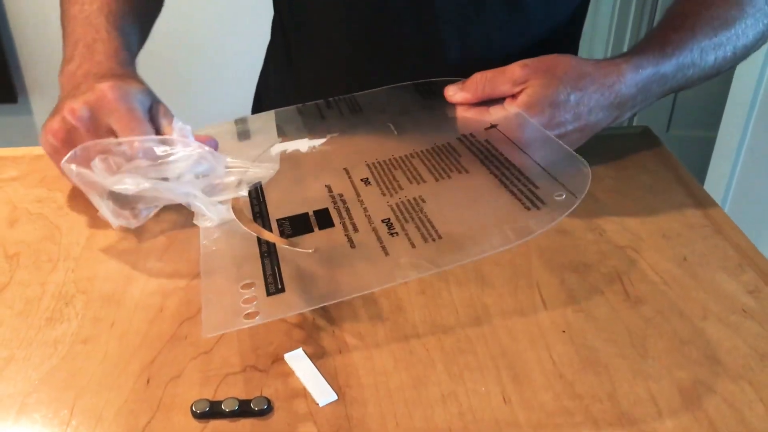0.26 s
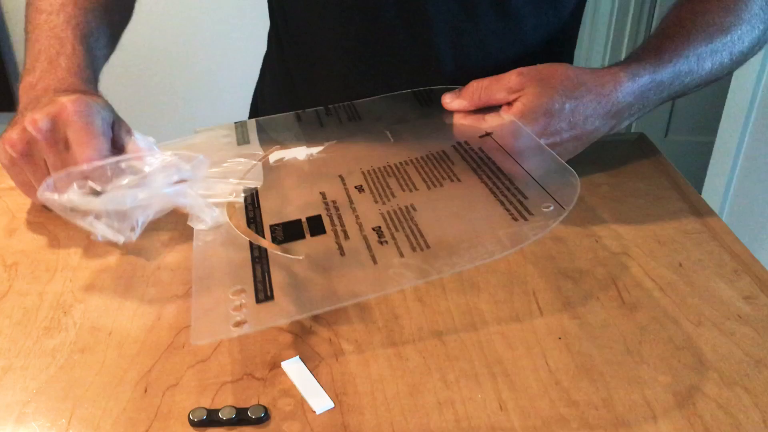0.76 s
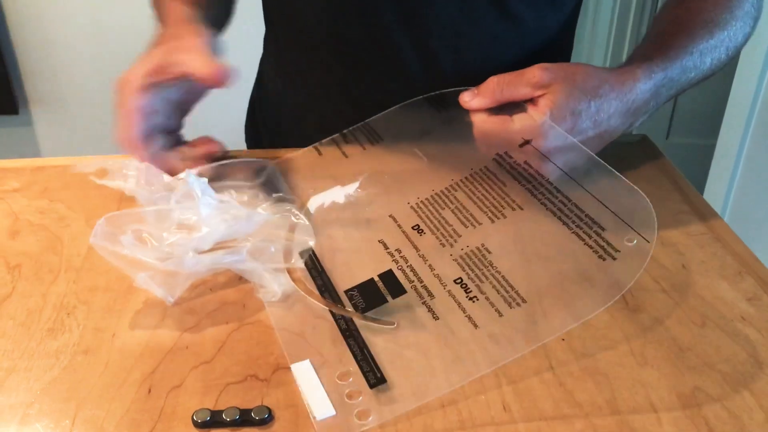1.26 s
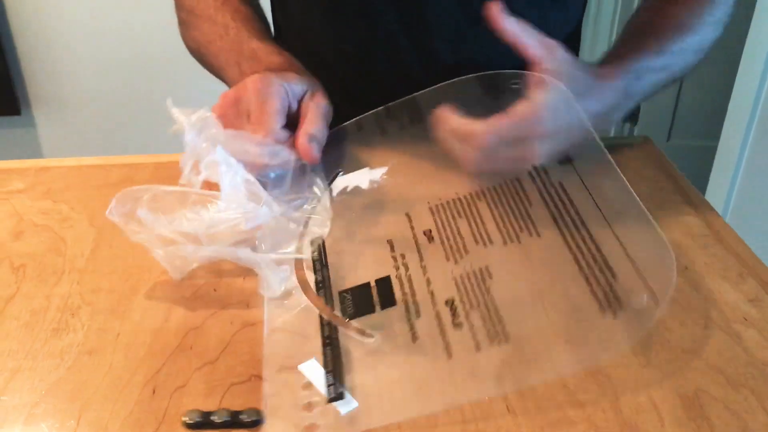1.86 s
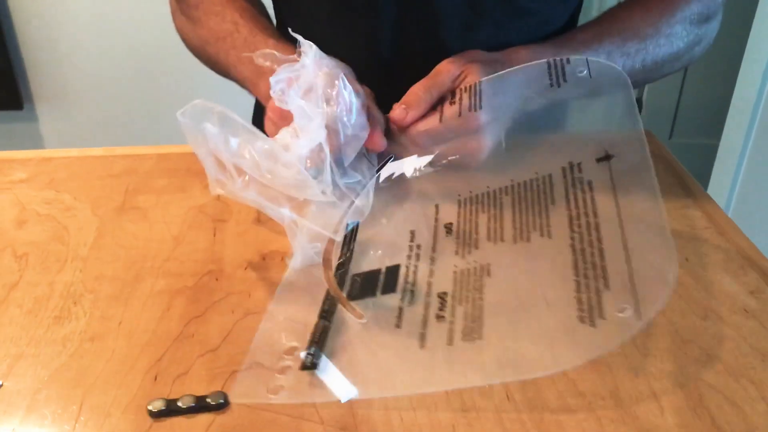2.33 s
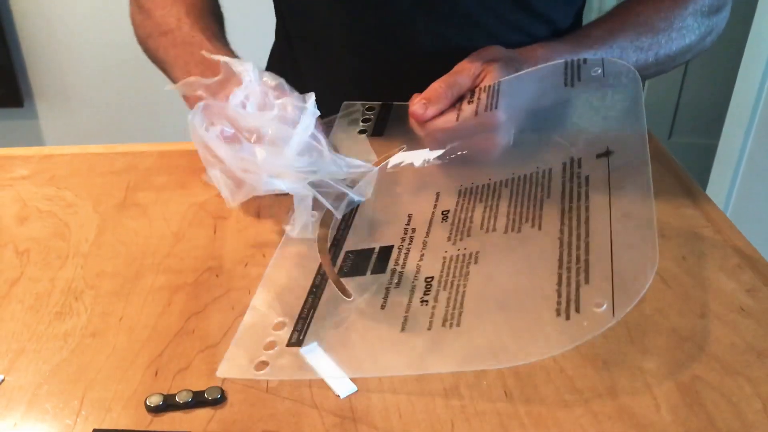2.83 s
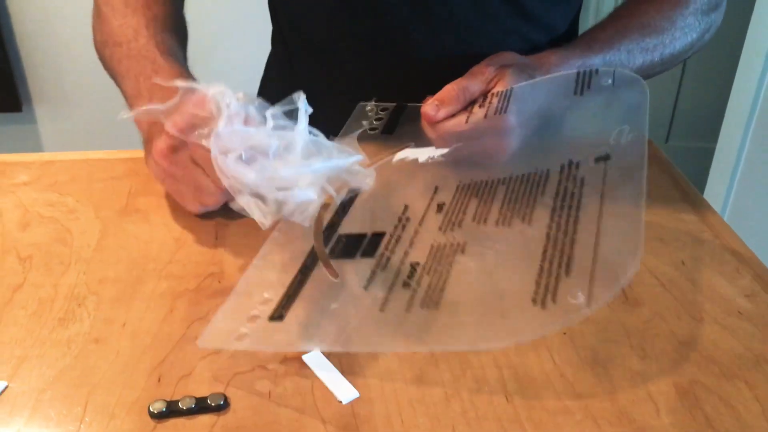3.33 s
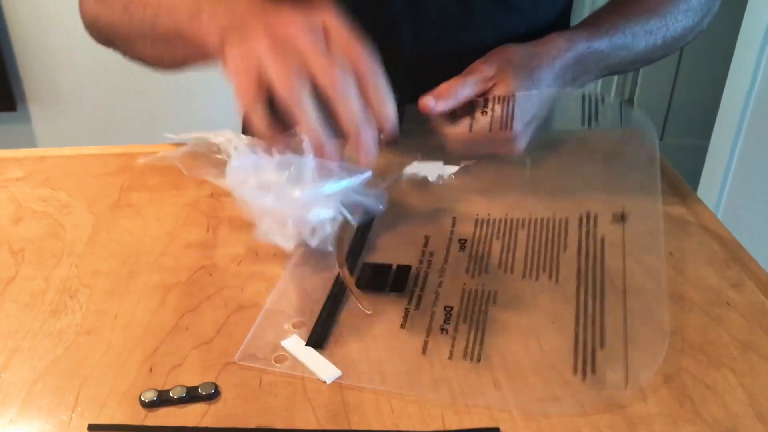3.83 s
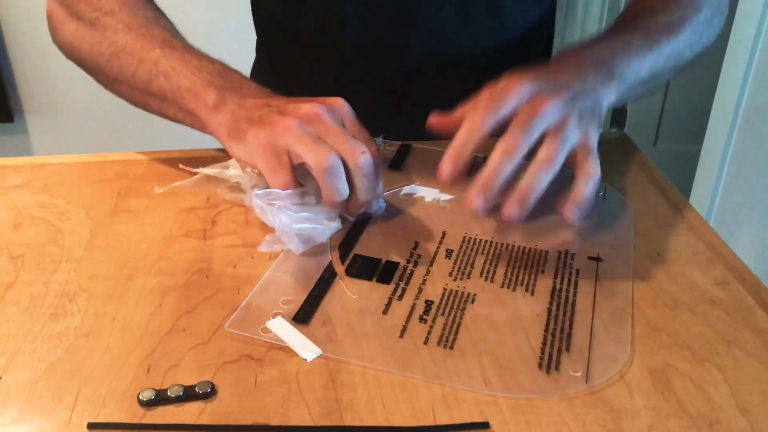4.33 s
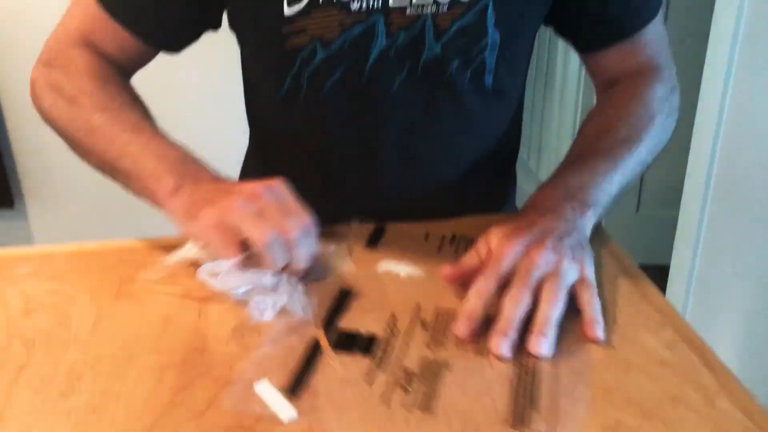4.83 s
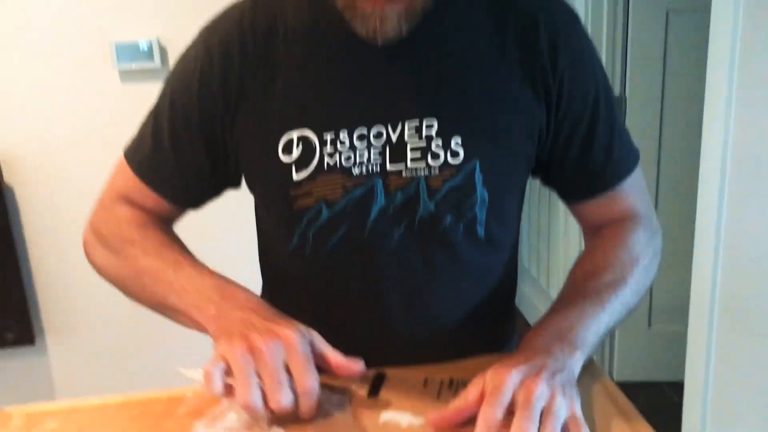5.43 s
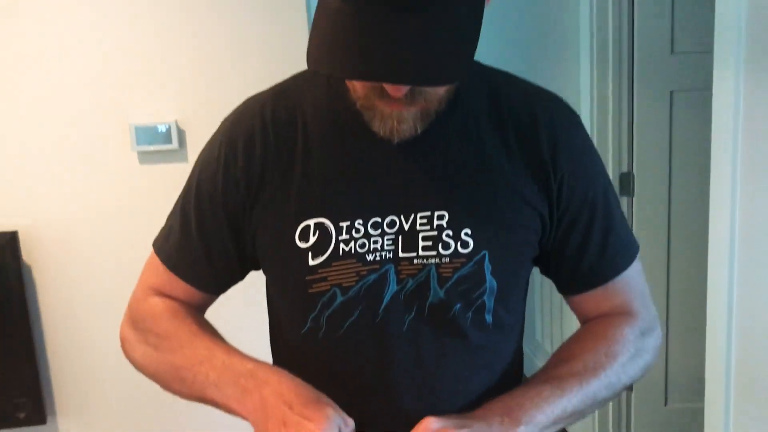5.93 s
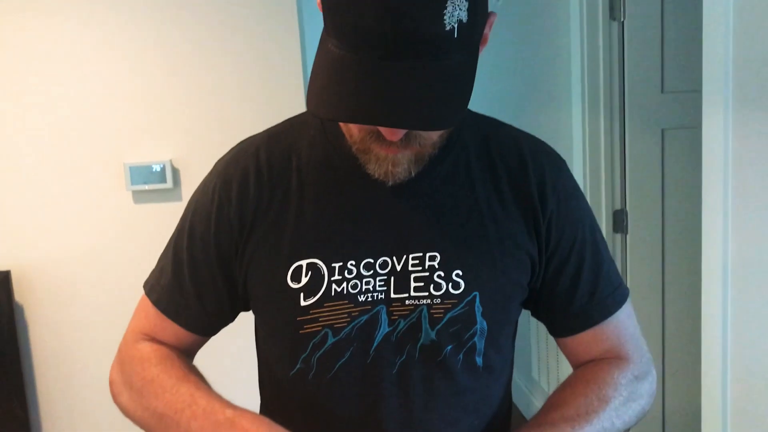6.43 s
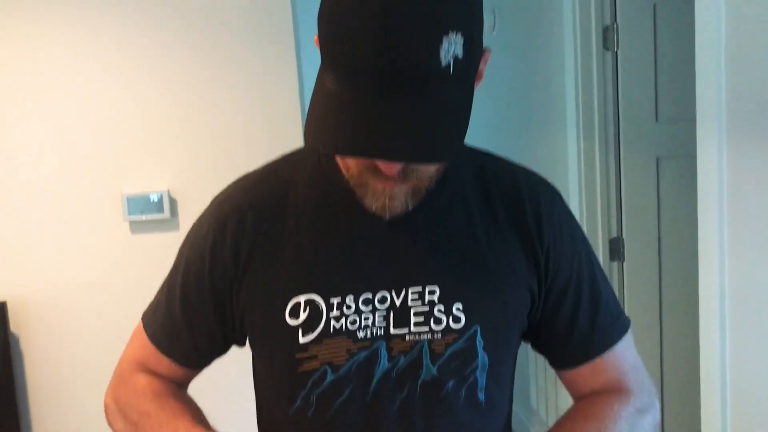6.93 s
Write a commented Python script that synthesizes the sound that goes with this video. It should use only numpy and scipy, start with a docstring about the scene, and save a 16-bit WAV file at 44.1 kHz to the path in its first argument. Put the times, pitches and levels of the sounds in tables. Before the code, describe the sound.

Hands peel crackling film from a plastic sheet that buckles with hollow pops, then scrunch the film up, close by in a small room.

```python
"""First, thin protective film is peeled off a clear plastic sheet. Each pull swells a crinkle of countless
tiny creases, the larger ones snap one by one, and the stiff sheet buckles with hollow pops and bends with
soft falling thumps. From about 3.6 s the loose film is crumpled by hand on a wooden table and crackles
more coarsely. Near 5 s a palm slides the sheet along the table, then the crumpling goes on more gently.
All the while the hands rub dully and a small room answers, close to one microphone."""
import sys
import numpy as np
from scipy import signal
from scipy.fft import rfft, irfft
from scipy.io import wavfile
from scipy.ndimage import uniform_filter1d

SR = 44100
rng = np.random.default_rng(int(sys.argv[2]) if len(sys.argv) > 2 else 0)


def put_to_file(sound):
    """Save the sound as 16-bit audio at rate SR, in the file named by the first command-line argument."""
    columns = np.atleast_2d(sound).T  # one column per channel
    safe = np.clip(columns, -1, 1)
    whole_steps = np.round(safe * 32767)
    wavfile.write(sys.argv[1], SR, whole_steps.astype(np.int16))


N = 316638

# The film sounds in three ranges: a low "body", a middle "crisp" and a high "sizzle".
# Tone of the body and the crisp, for stretched and for loose film: (frequency [Hz], level [dB])
TAUT_BODY = [(150, -27), (400, -12), (540, -1), (720, 3), (1000, 0.5), (1450, 2), (1900, -3.5),
             (2600, -15.5), (6000, -60)]
LOOSE_BODY = [(150, -20), (300, -7.5), (430, -16), (570, -5.5), (740, -9), (1000, 0), (1400, 1.5),
              (1900, -1.5), (2600, -14.5), (6000, -71)]
TAUT_CRISP = [(700, -29), (1600, 1), (2100, -2), (2500, 3), (2950, 4), (4000, 5), (4900, 1.5), (5800, 1.5),
              (7200, -4.5), (12000, -32.5)]
LOOSE_CRISP = [(700, -56), (1600, -8.5), (2000, -5.5), (2450, -6.5), (2900, 4), (3400, 2), (3900, 1.5),
               (4900, -5), (5800, -3), (7200, -12.5), (12000, -72)]
# How fast the wrinkles under the fingers come and go: (changes [1/s], strength [dB])
CLUMPING = [(3, -25), (15, 0), (40, 0), (90, -40), (300, -120)]

def crinkle(peel_per_s=1700, wad_per_s=430, spread_db=6.5, clump_db=2, facets=90):
    """Countless tiny creases flip, each on one facet: a small flat patch of film with its own pitch."""
    db, body_db, sizzle_db = effort()
    loose = looseness(np.arange(N) / SR)
    # peeling lets go in many fine slips, the loose wad in fewer; working harder makes more of both
    rate = (peel_per_s + (wad_per_s - peel_per_s) * loose) * amp(.55 * (db + 51.5))
    kicks = (rng.random(N) < rate / SR) * amp(spread_db * np.minimum(rng.exponential(1, N), 3.2))
    # the hand feeds in energy steadily: a big slip leaves less for its neighbours
    kicks /= np.sqrt(abs(uniform_filter1d(kicks ** 2, size=1100)) + 1.27 * rate / SR)
    facet = rng.integers(0, facets, N)
    facet_hz = 520 * 27 ** rng.random(facets)
    quick = np.clip(.5 + sizzle_db / 16, 0, 1)
    body, crisp, sizzle = amp(body_db - 1), amp(-.5), amp(sizzle_db - 2)
    # (tone, strength, fade time [ms])
    ranges = [(tone(TAUT_BODY), body * (1 - loose), 1.9), (tone(LOOSE_BODY), body * loose, 1.2),
              (tone(TAUT_CRISP), crisp * (1 - loose), .8), (tone(LOOSE_CRISP), crisp * loose, .6),
              (sizzle_tone(5), sizzle * np.sqrt(1 - quick), .4),
              (sizzle_tone(25), sizzle * np.sqrt(quick), .35)]
    out, at = np.zeros(N), np.flatnonzero(kicks)
    for taps, strength, fade_ms in ranges:
        clicks = [np.convolve(crease(fade_ms, size=512), taps)[:len(taps)] for _ in facet_hz]
        rings = np.array([facet_ring(click, hz) for click, hz in zip(clicks, facet_hz)])
        rings /= np.linalg.norm(rings, axis=1, keepdims=True)
        clumps = unit_level(amp(clump_db * noise(CLUMPING)))
        sizes = (kicks * amp(db) * strength * clumps)[at]
        places = at[:, None] + np.arange(len(taps))
        out += np.bincount(places.ravel(), (sizes[:, None] * rings[facet[at]]).ravel(), N)[:N]
    return out

# The film stirring in the grip between strokes: (time [s], level [dB])
GRIP = [(0, -53), (.2, -59), (.42, -64), (.56, -72), (.8, -55), (1.1, -58), (1.28, -69), (1.7, -58.5),
        (2.2, -68), (2.6, -66), (3.2, -75), (3.6, -64.5), (3.8, -77.5), (4.1, -52), (4.45, -59.5),
        (5.1, -45.5), (5.5, -58.5), (7.15, -57.5)]
# Pulls and squeezes: (start [s], length [s], level [dB], extra body [dB], extra sizzle [dB])
STROKES = [(-.02, 0.12, -40.5, -1.5, 0), (.2, 0.21, -59, -10, -3), (.65, 0.094, -63.5, 10.5, 9.5),
           (.735, 0.086, -48.5, 1.5, 2), (0.799, 0.055, -41, -1.5, 4.5), (0.859, 0.077, -38, 0, 1.5),
           (0.994, 0.042, -47.5, 3.5, 3.5), (1.3, 0.088, -56, -10, 1), (1.365, 0.02, -57.5, 9.5, 4),
           (1.485, 0.095, -56.5, 3.5, 2), (1.6, 0.11, -51.5, -2, -20), (1.73, 0.16, -51, 3, -6),
           (1.93, 0.098, -50, 2.5, -11), (2.09, 0.073, -60, 2, -5), (2.37, 0.047, -56, 2, 6.5),
           (2.46, 0.077, -48, -11, 5.5), (2.63, 0.1, -44.5, -1, -3.5), (2.875, 0.048, -54, 7, -11),
           (3.045, 0.039, -53, 7.5, -11), (3.37, 0.08, -51.5, -1.5, 6.5), (3.425, 0.087, -45.5, -2, 4),
           (3.857, 0.095, -44, -2, 0), (3.96, 0.16, -44, -4, 0), (4.344, 0.078, -63.5, 13.5, 9),
           (4.425, .05, -51.5, -12, -7), (4.565, 0.21, -52.5, 1, 4.5), (4.679, 0.17, -41, -2, 1),
           (4.816, .125, -33, -3, 0), (4.9, 0.14, -44.5, 0, 6), (5.015, 0.079, -37.5, -1, 0),
           (5.119, 0.089, -42, -6.5, 2), (5.185, 0.043, -37.5, -4.5, 5), (5.211, 0.2, -49, -12, 0),
           (5.495, 0.14, -49, -3.5, -1.5), (5.625, 0.11, -52, -1.5, 3.5), (5.69, 0.088, -50, 1, 5),
           (5.875, 0.17, -54, 1, -1), (5.958, 0.11, -55.5, 4.5, 2), (6.161, 0.058, -47, 1, 5.5),
           (6.33, 0.13, -49, 0, -8), (6.475, 0.068, -46.5, -5.5, 0), (6.74, 0.035, -56.5, 5, 5),
           (6.92, 0.1, -54.5, 4.5, 2.5), (7.066, 0.13, -43, -3, 2)]

def effort():
    """Grip and strokes add up to the crinkle's level, extra body and extra sizzle, in dB over time."""
    power = (amp(curve(GRIP)) * amp([[0], [1.5], [.5]])) ** 2  # rows: crisp, body, sizzle
    for start, length, db, body_db, sizzle_db in STROKES:
        force = hand_force(start, length)
        power += (force * amp([[db], [db + body_db], [db + sizzle_db]])) ** 2
    level, body, sizzle = 10 * np.log10(power)
    return level, body - level, sizzle - level

def hand_force(start, length):
    """One movement of the hand builds, peaks halfway and lets go."""
    progress = np.interp(np.arange(N) / SR, [start, start + length], [0, 1])
    return (4 * progress * (1 - progress)) ** .56

def looseness(time):
    """0 while the film is stretched on the sheet, 1 once it is a loose wad."""
    return np.clip((time - 3.6) / .16, 0, 1)

def crease(fade_ms, size=900):
    """One crease flips: a jumble of vibrations swells, dies fast and lingers in the film around it."""
    age = np.arange(size) * 1000 / SR / fade_ms
    swell = 1 - np.exp(-(age / .11) ** 2)
    return rng.standard_normal(size) * swell * (np.exp(-age) + np.exp(-age / 3))

def facet_ring(sound, hz, boost_db=9):
    """The patch of film around a crease favours one frequency."""
    b, a = signal.iirpeak(hz, Q=5, fs=SR)
    return sound + (amp(boost_db) - 1) * signal.lfilter(b, a, sound)

# Tone of the film's high sizzle: (frequency [Hz], level [dB])
SIZZLE = [(2000, -41.5), (5000, -15), (6400, 1), (7600, -3.5), (8900, 0), (10500, -4), (13000, -1),
          (15800, -3.5), (18000, -40)]

def sizzle_tone(bright_db):
    """A quicker snap is brighter and also reaches higher."""
    db_per_octave = .079 * bright_db
    return tone([(hz, db + db_per_octave * np.log2(max(hz, 6000) / 10000)) for hz, db in SIZZLE])

# The larger creases: (time [s], level [dB], extra body [dB], extra sizzle [dB], facet pitch [Hz])
SNAPS = [(0.0057, -38.5, -18.3, -3, 6550), (0.06, -36.5, -8, -1, 6900), (0.1813, -44, -1.0, 5, 9500),
         (0.2126, -45.5, -2.3, 2, 4560), (0.231, -37.5, -5.5, 2.5, 14450), (0.2973, -35, -12, 2, 9550),
         (0.325, -41.6, -6, 3.5, 3700), (0.4184, -48.5, 2.4, 0, 1510), (0.5065, -49.5, -40, 0.5, 3250),
         (0.5514, -38.7, -7.5, -1.7, 2900), (0.5628, -48.5, -3, -2, 4700), (0.617, -40, -2.5, 3, 1420),
         (0.6617, -41, -5.5, 3, 9110), (0.7227, -44, -4, 1.4, 6460), (0.7527, -34, -2, 2, 11600),
         (0.8381, -31, -6, -4, 4440), (0.844, -37, 2, -5.3, 4010), (0.9508, -38, -23.5, 1.5, 3900),
         (0.9703, -56, -5.3, 14, 10750), (1.0164, -35.5, -4, -5, 8330), (1.0732, -47, -14.0, 1, 14320),
         (1.1078, -47.5, -17.5, 3.5, 6010), (1.1474, -44, -6, -0.1, 5550), (1.474, -46.5, -22, 1, 6440),
         (1.542, -45, -21, 4.5, 12490), (1.61, -46, -10.4, 3, 8630), (1.632, -39, -24, -4, 3620),
         (1.6829, -42, -5.8, -5, 3550), (1.7332, -29.5, -7, -6, 3470), (1.8871, -32.5, -2, -5, 1050),
         (1.9153, -40, -4, -5.6, 3290), (1.9514, -43.6, -2, 2, 770), (1.9943, -45, -18, -0.3, 6480),
         (2.017, -49.2, -12, 1, 5900), (2.058, -46.5, -1, 6.5, 8400), (2.072, -43, -19, -13, 2930),
         (2.1248, -43, 0.1, 3.5, 1230), (2.1514, -53.5, 5, 10, 9600), (2.206, -40, -17.3, -4.0, 5510),
         (2.2422, -51.5, -7, 4, 6870), (2.411, -54.5, -6, 4, 11200), (2.6335, -30.5, -6, -4, 2750),
         (2.8053, -43.5, -8.1, -4.9, 2240), (2.855, -39.5, -0.5, -2.2, 730), (2.867, -41, -1.5, 7.5, 6240),
         (2.8726, -44.5, 0, -1, 7030), (2.8971, -34.5, 0.2, 0.3, 2050), (3.0067, -38, -5, 0.5, 14230),
         (3.0208, -41, 0, 8, 13700), (3.0733, -45, 0.8, 13.5, 8500), (3.0983, -46.5, -3.2, -1, 3960),
         (3.208, -46.5, -12.9, -2, 5300), (3.2468, -43, -9, -6, 4400), (3.273, -42.5, -21, 6, 7300),
         (3.6328, -48.5, -12, 5.5, 3700), (3.809, -55.9, -7.4, 13, 6630), (3.8162, -50, -3, 5.5, 6220),
         (3.8383, -64, -11.9, 10, 8350), (3.871, -41.5, -6.3, 7, 5990), (3.885, -55.5, 8, 20, 8480),
         (3.9255, -44, 1, 13, 9000), (3.9699, -41.4, -8.7, 1, 5730), (4.01, -50, -1, 14, 8120),
         (4.0335, -42.5, -22.8, 12, 10900), (4.1325, -46, -9.4, 7, 6430), (4.144, -40, -18, 6.5, 4030),
         (4.189, -52, 7, 3.8, 1460), (4.2281, -52.5, -18, 12.5, 14400), (4.2414, -50, 1.5, 6, 9280),
         (4.2766, -44.5, -2, -27, 4050), (4.3106, -59, 3, 11, 13850), (4.3343, -45.2, -1.5, -4, 2830),
         (4.4167, -61, -1, 18.5, 9930), (4.4237, -48, -16, 2, 6370), (4.499, -48.5, -6, 3, 3900),
         (4.5487, -46.0, -16, 0, 2930), (4.5678, -44, -19.7, 1, 7520), (4.6274, -37.5, -12.8, -7, 2860),
         (4.6493, -43, -11, 7.5, 11910), (4.66, -42.5, -5.3, 17, 14000), (4.7301, -35.2, -16, -0.5, 5230),
         (4.7724, -31, -12, -14, 3240), (4.7878, -36.1, -7, -21, 3040), (4.799, -39, 1, 3.0, 6180),
         (4.8374, -44, -13, 11, 6120), (4.8658, -30.5, -6, 2.5, 2840), (4.9449, -40.5, 1.5, 9.5, 6290),
         (5.0426, -44.5, 3, 15.5, 8300), (5.1154, -32, -15, -1.5, 3700), (5.2125, -34, -8, 1.5, 8500),
         (5.3326, -38.2, -5, 2, 3240), (5.417, -44.5, -8, 9.5, 14400), (5.507, -46, -8.2, 8.5, 12800),
         (5.521, -42.3, -3.5, 5.5, 12900), (5.6471, -50.5, 9, 2, 940), (5.7993, -45, -6, 2, 7080),
         (5.858, -41.5, -15, -3, 3800), (6.0079, -56, -11, 17.5, 13300), (6.0829, -46.5, -1, 4, 3290),
         (6.2117, -45.4, -12.8, 1, 4300), (6.399, -53, -9, 16, 13300), (6.425, -48, -7.6, 8, 6180),
         (6.4995, -40.5, -16, -4.7, 3700), (6.595, -51.5, -15, 11, 6830), (6.7671, -47.5, -17.5, -4, 6010),
         (6.8264, -39.5, -5.5, 7.5, 13900), (6.927, -54, 8.5, -7, 1020), (7.073, -43, -13.2, -4, 4030),
         (7.1537, -37.5, -4.5, 3, 13220)]
# A crease rings longer in stretched film than in loose film: (time [s], fade time of the crisp [ms])
SNAP_FADE = [(0, 0.86), (2.9, 0.46), (3.9, 0.52), (7.1, 0.24)]

def snaps():
    """Each large crease snaps in all three ranges, tinted by its facet; the body rings longest."""
    taut, loose = (tone(TAUT_BODY), tone(TAUT_CRISP)), (tone(LOOSE_BODY), tone(LOOSE_CRISP))
    out = np.zeros(N)
    for time, db, body_db, sizzle_db, hz in SNAPS:
        fade_ms = np.interp(time, *np.transpose(SNAP_FADE))
        body, crisp = loose if looseness(time) > .5 else taut
        ranges = [(body, body_db + 2, 2.1), (crisp, 1.5, 1), (sizzle_tone(sizzle_db), sizzle_db, .63)]
        for taps, extra_db, stretch in ranges:
            click = np.convolve(crease(fade_ms * stretch), taps)
            add(out, time, db + extra_db, facet_ring(click, hz))
    return out

def slips(spread_db=3):
    """A crease gives a little just before it snaps, and sets off two neighbours just after."""
    out = np.zeros(N)
    for time, db, _, sizzle_db, _ in SNAPS:
        lead, *gaps = rng.uniform(.5, 1.5, 3) * [.0024, .009, .009]  # seconds
        for delay, drop_db in zip([-lead, *np.cumsum(gaps)], [13, 15, 15]):
            slip_db = db - drop_db + spread_db * rng.standard_normal()
            small_snap(out, time + delay, slip_db, sizzle_db - 1, fade_ms=.25)
    return out

def stray_creases(count=130, spread_db=3.5):
    """Medium creases flip at random moments, louder as the film is worked harder."""
    out = np.zeros(N)
    level, _, sizzle_db = effort()
    for at, luck in zip(rng.integers(0, N, count), rng.standard_normal(count)):
        db = -50.5 + .62 * (level[at] + 53) - looseness(at / SR) + spread_db * luck
        small_snap(out, at / SR, db, sizzle_db[at] + 3.5, fade_ms=.63)
    return out

def small_snap(mix, time, db, sizzle_db, fade_ms):
    """Adds a lesser crease, only crisp and sizzle, on a facet of random size."""
    hz = 1000 * 13 ** rng.random()
    for taps, extra_db in ((tone(TAUT_CRISP), 0), (sizzle_tone(sizzle_db), sizzle_db)):
        click = np.convolve(crease(fade_ms), taps)
        add(mix, time, db + extra_db, facet_ring(click, hz))

# The sheet buckling:
# (time [s], level [dB], pitch [Hz], fade time [ms], crack above pop [dB], sizzle above crack [dB])
POPS = [(.0425, -36.5, 735, 6.7, -1, 5), (.048, -30, 770, 12, -10, -3), (.0585, -36, 725, 11, 4, 2.5),
        (.273, -33, 700, 11, -9, -5), (.2865, -33.5, 665, 5.1, -35, -8),
        (1.730, -29.5, 1070, 2.6, -5.5, -1), (1.7373, -27.5, 1020, 2.9, -3, -6),
        (1.742, -27.5, 1120, 12, 2, -15), (1.8865, -33.5, 910, 3.7, -11, -10),
        (1.8945, -32, 940, 3, 0, -20), (1.9636, -34.5, 810, 2, -8, -10),
        (2.2714, -35.5, 1100, 7, -15.5, -17), (2.342, -42, 830, 7.9, -22, -16), (2.45, -50, 900, 3.9, 0, 3),
        (2.457, -30, 965, 3.4, 3, -4.5), (2.4626, -28, 744, 2.8, 0, 3), (2.480, -37.5, 660, 10, -6, 6),
        (2.631, -20, 1370, 5, -14, 7), (2.633, -23.5, 720, 4, -9, -5), (2.6397, -27, 1170, 2.7, -9.5, 9),
        (2.662, -31, 810, 6, -7, -4), (3.481, -33, 900, 4.9, -5.5, 3.5)]
# The notes at which the bent sheet naturally rings: (frequency [Hz], level [dB])
SHEET_NOTES = [(565, -12), (630, -8.5), (707, 2), (755, -4.5), (836, -3), (900, -17), (990, 2),
               (1045, -0.5), (1170, 2), (1260, 1.5), (1410, -1), (1490, 1.5), (1640, 3), (1850, -6),
               (2130, -3)]
# Tone of the whole sheet's hollow knock: (frequency [Hz], level [dB])
KNOCK = [(200, -25), (420, -10.5), (540, -2.5), (720, -7.5), (950, 2.5), (1450, 7.5), (1900, -2.5),
         (2600, -9.5), (6000, -45)]

def pops(rise_ms=.89, knock_ms=3.8, crack_ms=1.9):
    """The sheet buckles: its notes near the pop's pitch ring, with a knock and a crack from the film."""
    out, t = np.zeros(N), np.arange(SR // 16) / SR
    ms = t * 1000
    note_hz, note_db = np.transpose(SHEET_NOTES)[:, :, None]
    swell = 1 - np.exp(-(ms / rise_ms) ** 2)
    for time, db, hz, fade_ms, crack_db, sizzle_db in POPS:
        phase = rng.random((len(SHEET_NOTES), 1))
        reach_octaves = .42 * hz / 1000  # a small, high buckle is quicker and reaches more notes
        strength = amp(note_db) / (1 + (np.log2(note_hz / hz) / reach_octaves) ** 2)
        notes = (strength * np.sin(2 * np.pi * (note_hz * t + phase))).sum(0)
        add(out, time, db, notes * swell * np.exp(-ms / fade_ms))
        knock = np.convolve(crease(knock_ms, size=2400), tone(KNOCK))
        add(out, time, db - 8 + .32 * (db + 26), knock)  # harder buckles have a bigger share of knock
        for taps, extra_db in ((tone(TAUT_CRISP), 0), (sizzle_tone(sizzle_db), sizzle_db)):
            add(out, time, db + crack_db + extra_db, np.convolve(crease(crack_ms), taps))
    return out

# The sheet bending under the hands: (time [s], level [dB], pitch about 6 ms into the thump [Hz])
THUMPS = [(0.835, -43, 207), (0.894, -37, 194), (0.916, -42, 190), (1.01, -39, 222), (1.232, -46.5, 240),
          (1.245, -48, 148), (1.854, -41, 282), (1.881, -42, 148), (1.912, -48, 196), (2.274, -42.5, 209),
          (2.336, -49, 275), (2.53, -40.5, 140), (2.564, -44, 131), (2.646, -42, 180), (2.675, -41, 200),
          (2.725, -52, 96), (3.068, -45, 266), (3.229, -48, 88), (3.485, -39.5, 322), (3.898, -46, 222),
          (4.532, -45, 118), (4.784, -53, 94), (4.849, -38, 182), (5.06, -44, 285), (5.21, -47, 280),
          (5.298, -50, 95), (5.43, -43, 105), (6.19, -47, 236)]

def thumps(fall_s=.00634, fade_s=.00405):
    """Short ripples in the sheet outrun long ones, so each thump falls in pitch."""
    out, t = np.zeros(N), np.arange(SR // 12) / SR
    for time, db, hz in THUMPS:
        pitch = 2 * hz / (1 + t / fall_s)
        wave = np.sin(2 * np.pi * np.cumsum(pitch) / SR)
        add(out, time, db - 4, wave * t * np.exp(-t / fade_s))
    return out

def sheet_ring(plastic, ring_s=.15, damping_db=9):
    """Every crease and pop leaves the sheet ringing, more quietly once it lies under the hand."""
    t = np.arange(SR // 3) / SR
    fade = amp(-60 * t / ring_s)
    notes = sum(amp(db) * np.sin(2 * np.pi * (hz * t + rng.random())) for hz, db in SHEET_NOTES)
    drive = plastic * amp(-5 - damping_db * looseness(np.arange(N) / SR))
    return signal.oaconvolve(drive, 2 * notes * fade / fade.sum())[:N]

# Shoves of the sheet on the table: (start [s], length [s], level [dB])
SHOVES = [(-.05, 0.084, -50), (0.653, 0.53, -62), (1.81, 0.18, -55.5), (2.14, 0.31, -57), (2.47, .3, -57),
          (2.994, .14, -65), (3.197, 0.17, -69), (3.422, .2, -60.5), (3.86, 0.18, -52.5), (4, 0.26, -57),
          (4.44, 0.25, -61), (4.614, 0.22, -56.5), (4.957, 0.61, -60), (5.45, 0.61, -62.5),
          (6.8, 0.25, -64), (7.08, 0.18, -53)]
# Tone of the rubbing: (frequency [Hz], level [dB])
RUB_TONE = [(25, -29), (50, 8), (62, 2), (78, 3.5), (95, 1), (115, -1), (160, -9.5), (210, 0.5),
            (260, -5.5), (340, -2), (500, -8), (900, -3.5), (3000, -70)]

def rubbing(resting_db=-66.5, lumpy_db=3):
    """Hands and sheet rub dully and unevenly on the table, swelling with each shove."""
    wobble = noise([(4, -19), (12, 12), (25, -9), (60, -57), (200, -120)])
    lumps = unit_level(amp(lumpy_db * wobble))
    shove_power = sum((amp(db) * hand_force(start, length)) ** 2 for start, length, db in SHOVES)
    return np.sqrt(amp(resting_db) ** 2 + shove_power) * lumps * noise(RUB_TONE)

# The palm pushing the sheet along the table: (time [s], level [dB])
SLIDE = [(4.465, -96), (4.485, -59), (4.62, -62), (4.72, -66), (4.82, -57), (4.92, -50), (4.98, -65),
         (5.22, -61), (5.3, -88)]
# Tone of that slide: (frequency [Hz], level [dB])
SLIDE_TONE = [(25, -30), (55, 12), (110, 11), (160, -14), (205, 11), (260, -5), (330, -1), (450, -26),
              (1500, -60)]

def palm_slide():
    """Friction under the palm drones in the sheet and the table top."""
    return amp(curve(SLIDE)) * noise(SLIDE_TONE)

def room(plastic, directions=5):
    """Creases face different ways, so from moment to moment they set off different echoes."""
    facing = np.repeat(rng.integers(0, directions, N // 300 + 1), 300)[:N]
    shares = [np.sqrt(abs(uniform_filter1d(1. * (facing == k), size=80))) for k in range(directions)]
    return plastic + sum(signal.oaconvolve(plastic * share, echoes())[:N] for share in shares)

# How long the room rings: (frequency [Hz], time to fade by 60 dB [s])
ROOM_FADE = [(150, 0.6), (600, 0.5), (1400, 0.67), (3700, 0.63), (9000, 0.44), (16000, 0.32)]

def echoes(early_db=-11, tail_db=-9, count=14):
    """Table and person throw back the first echoes; then a wash fades, each pitch at its own speed."""
    size = SR // 2
    early = np.zeros(size)
    early[(rng.uniform(.002, .016, count) * SR).astype(int)] = rng.choice([-1., 1.], count)
    hz, t, bands = signal.stft(rng.standard_normal(size), SR, nperseg=256)
    bands *= amp(-60 * t / look_up(ROOM_FADE, hz)[:, None])
    tail = signal.istft(bands, SR, nperseg=256)[1][:size]
    tail *= np.clip(np.arange(size) / SR / .0014, 0, 1) ** 2
    return amp(early_db) * early / np.linalg.norm(early) + amp(tail_db) * tail / np.linalg.norm(tail)

# Tone of the room's air: (frequency [Hz], level [dB])
AIR_TONE = [(15, -40), (25, -28), (76, -3.5), (317, -14.5), (463, -19.5), (1040, -19), (3250, -24),
            (5880, -24), (10400, -39), (14800, -19.5), (16000, -37)]

def air(level_db=-64.5):
    """The room's air is a faint, steady rumble and hiss."""
    return amp(level_db) * noise(AIR_TONE)

def amp(db):
    """Turns decibels into a number to multiply by."""
    return 10 ** (np.asarray(db) / 20)

def unit_level(sound):
    """Scales a sound to an average power of 1."""
    return sound / np.sqrt(np.mean(sound ** 2) + 1e-20)

def add(mix, time, db, sound):
    """Mixes in a short sound, giving it as much energy as 5 ms at the level db."""
    gain = amp(db) * np.sqrt(.005 * SR / (np.sum(sound ** 2) + 1e-20))
    part = mix[max(0, round(time * SR)):][:len(sound)]
    part += gain * sound[:len(part)]

def look_up(points, hz):
    """Reads between the rows of a (frequency, value) table."""
    frequencies, values = np.transpose(points)
    return np.interp(np.log(hz + 1), np.log(frequencies + 1), values)

def curve(points):
    """Joins (time, value) points into one value for every sample."""
    return np.interp(np.arange(N) / SR, *np.transpose(points))

def tone(points, size=1024):
    """Filter taps: a tiny click that passes its tone on to any sound convolved with it."""
    log_gain = np.log(amp(look_up(points, abs(np.fft.fftfreq(size, 1 / SR)))))
    spectrum = np.exp(np.conj(signal.hilbert(log_gain)))  # packs the energy at the start
    taps = np.fft.ifft(spectrum).real[:size // 2]
    return taps / np.linalg.norm(taps)

def noise(points):
    """Steady noise with the given tone."""
    gain = amp(look_up(points, np.fft.rfftfreq(N, 1 / SR)))
    return unit_level(irfft(rfft(rng.standard_normal(N)) * gain, N))

def scene():
    """Film and sheet sound into the room, over dull rubbing on the table and faint air."""
    plastic = snaps() + slips() + stray_creases() + crinkle() + pops() + thumps()
    return (room(plastic) + sheet_ring(plastic) + rubbing() + palm_slide() + air())[None]

def record(dry, lowest_hz=36, highest_hz=16100):
    """The recorder cuts the deepest bass and the highest treble."""
    bass_cut = signal.butter(4, lowest_hz, "highpass", fs=SR, output="sos")
    treble_cut = signal.firwin(511, highest_hz, window=("kaiser", 9), fs=SR)
    return signal.oaconvolve(signal.sosfilt(bass_cut, dry), treble_cut[None], "same")

dry = scene()
out = record(dry)
put_to_file(out)
```